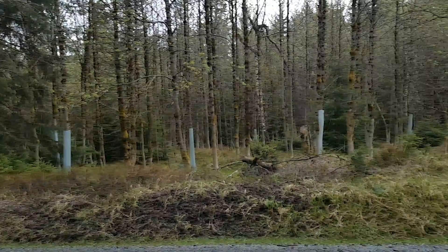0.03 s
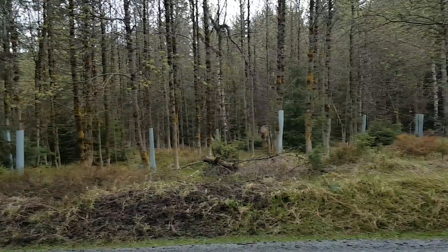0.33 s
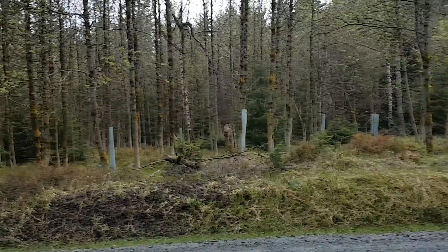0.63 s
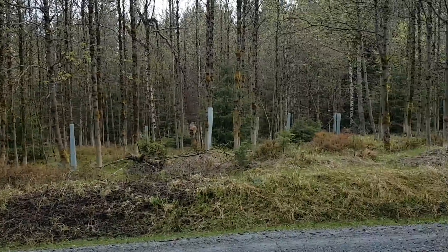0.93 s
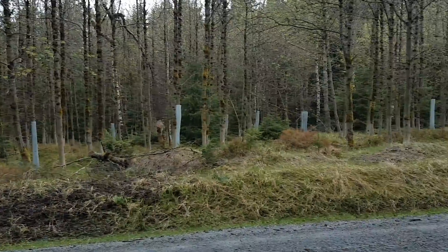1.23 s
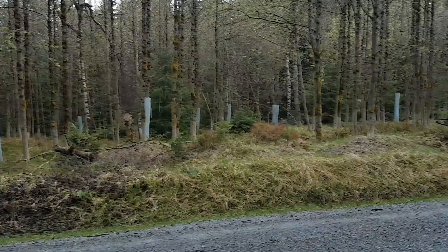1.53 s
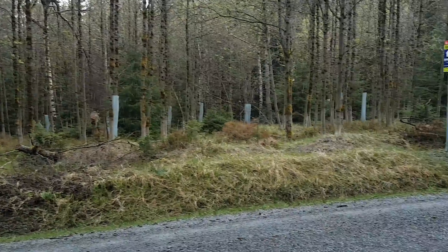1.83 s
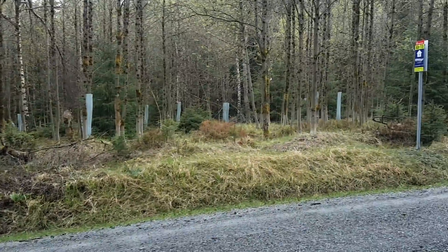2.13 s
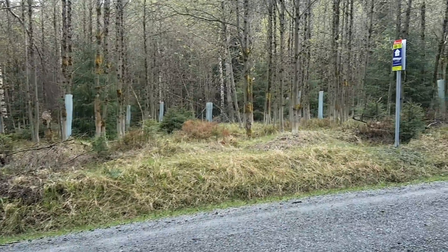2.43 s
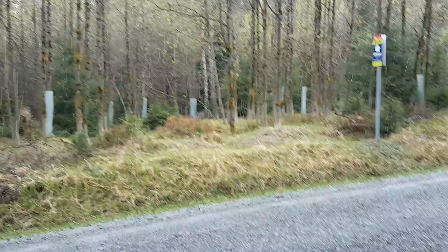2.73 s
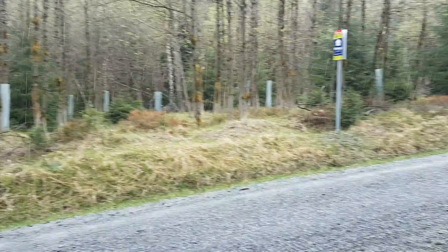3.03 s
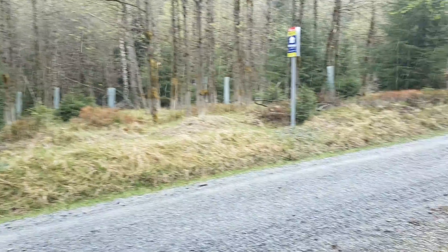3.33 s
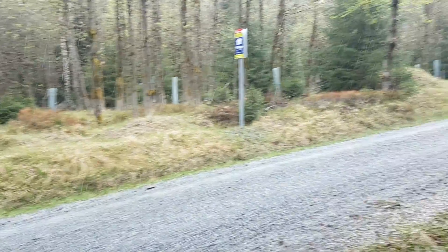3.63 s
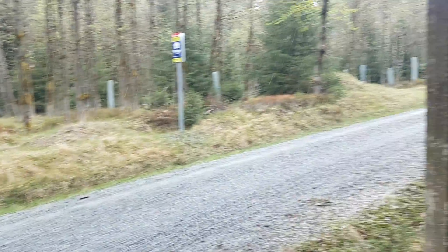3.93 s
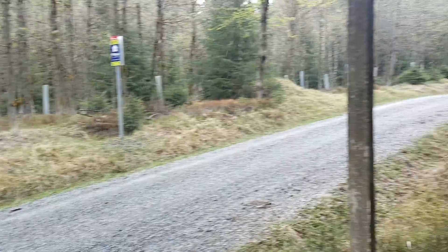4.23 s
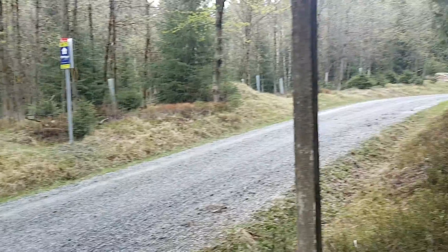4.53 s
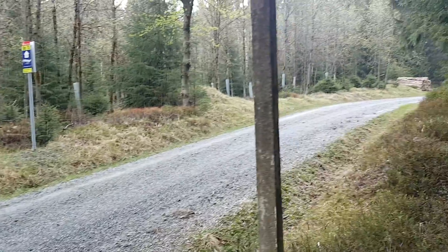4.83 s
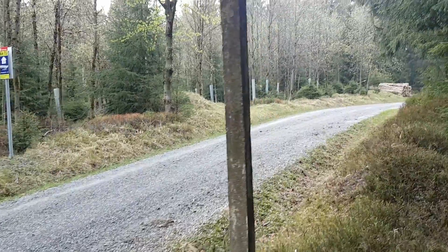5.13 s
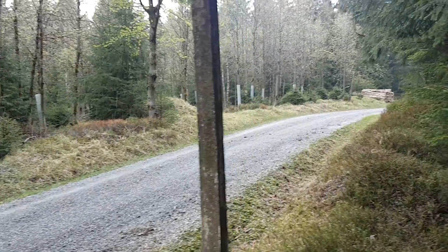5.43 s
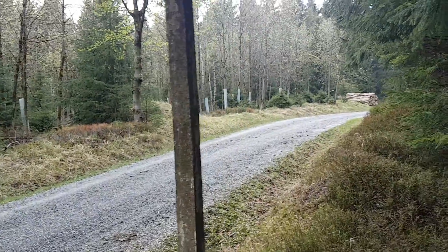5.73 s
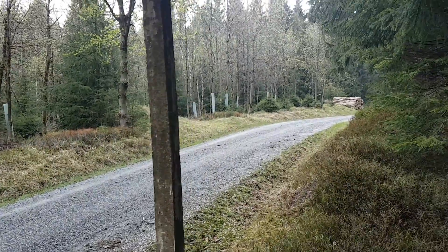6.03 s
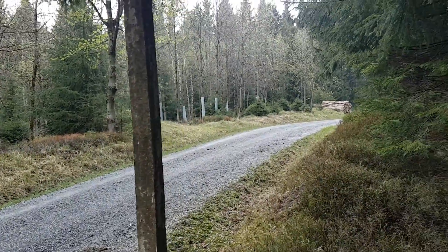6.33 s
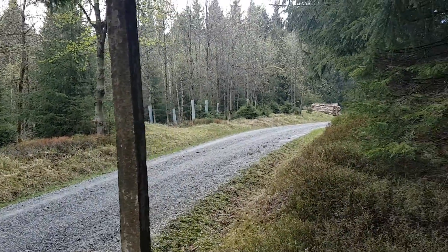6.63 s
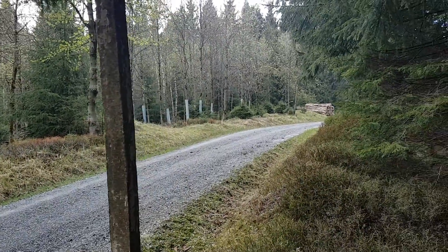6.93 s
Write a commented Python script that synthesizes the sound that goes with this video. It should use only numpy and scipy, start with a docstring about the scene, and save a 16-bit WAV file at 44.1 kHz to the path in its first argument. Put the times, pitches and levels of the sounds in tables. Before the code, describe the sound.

Fine hail and rain hiss steadily in a forest, while single hailstones click and tap sharply near the microphone.

```python
"""Fine hail and rain fall steadily on a forest road, its grass verge and the trees around it.
Each impact excites a heavily damped vibration: countless far ones merge into a hiss, nearer ones
patter, and single stones crack and ring right beside a hand-held camera with two microphone ports.
A light breeze rumbles on the ports, mostly at first; the hand bumps the camera and cloth rustles."""
import sys
import numpy as np
from scipy import signal
from scipy.fft import rfft, irfft, next_fast_len
from scipy.io import wavfile
from scipy.ndimage import map_coordinates

SR = 44100
rng = np.random.default_rng(int(sys.argv[2]) if len(sys.argv) > 2 else 0)


def wav_out(sig):
    """Save sig, one row per channel (or a flat mono array), as 16-bit PCM at SR to the path in sys.argv[1]."""
    wavfile.write(sys.argv[1], SR, np.round(np.clip(np.atleast_2d(sig).T, -1, 1) * 32767).astype(np.int16))


N = 311787

# the ports' low cut and treble dip, heard on close taps: (frequency [Hz], gain [dB])
CLOSE_RESPONSE = [(80, -54), (210, -23.5), (340, -7), (6800, 2.5), (8200, -5.5), (9200, -10), (11000, 7.5),
                  (13500, 5), (15500, 5)]
PORT_DELAY_S = .0004  # sound from one side reaches the far port this much later


def amp(db):
    """Decibels to amplitude ratio."""
    return 10 ** (np.asarray(db) / 20)


def unit(x):
    """Normalise to rms 1."""
    return x / np.sqrt(np.mean(x ** 2) + 1e-20)


def along(points, hz):
    """Interpolate (frequency [Hz], value) points on a logarithmic axis."""
    knots_hz, values = np.transpose(points)
    return np.interp(np.log(hz + 1), np.log(knots_hz + 1), values)


def wobble(rate):
    """Smooth random modulation: a spline through rate knots a second."""
    knots = rng.standard_normal(int(N * rate / SR) + 4)
    return map_coordinates(knots, [np.arange(N) * rate / SR])


def filtered(x, response):
    """Linear filtering: multiply the spectrum by a frequency response."""
    size = next_fast_len(N + SR // 4)
    return irfft(rfft(x, size) * response(np.fft.rfftfreq(size, 1 / SR)), size)[..., :N]


def minimum_phase(db):
    """Causality: folding the cepstrum gives a response that sounds only after the blow."""
    cepstrum = irfft(np.log(amp(db)))
    half = len(cepstrum) // 2
    fold = np.r_[1, np.full(half - 1, 2), 1, np.zeros(half - 1)]
    return np.exp(rfft(cepstrum * fold))


def diffuse(pair, spectrum):
    """Diffuse field: two independent signals are coloured and made partly coherent; rms 1."""
    # likeness of the two ports: (frequency [Hz], correlation [-1 to 1])
    correlation = [(50, 0.77), (480, 0.61), (850, 0.21), (1450, -0.2), (2100, 0.13), (3400, 0.098),
                   (6000, -0.12), (9500, 0.1), (13000, -0.049)]
    # their difference in colour: (frequency [Hz], left minus right [dB])
    imbalance = [(100, -1.3), (1500, -1.3), (4500, -2), (6000, -1.5), (7300, -6), (8500, 1.5), (10500, 5),
                 (14000, 2), (15500, -1)]

    def blend(hz):
        angle = np.arcsin(np.clip(along(correlation, hz), -1, 1)) / 2
        return amp(along(spectrum, hz)) * np.array([np.cos(angle), np.sin(angle)])[:, None]
    own, shared = filtered(pair, blend)
    sides = np.array([[.5], [-.5]])
    return unit(filtered(own + shared[::-1], lambda hz: amp(along(imbalance, hz) * sides)))


def taps(s, db, hz, rise_s, pan_db, lag_s, size):
    """Damped oscillators struck at times s, size samples long; a positive lag delays the right port."""
    index = (s * SR).astype(int)[:, None] + np.arange(size)
    ports = []
    for side in (.5, -.5):
        arrival = s + np.maximum(-2 * side * lag_s, 0)
        t = np.maximum(index / SR - arrival[:, None], 0)
        age = t / rise_s[:, None]
        envelope = amp(db + side * pan_db)[:, None] * age * np.exp(1 - age)
        ring = envelope * np.sin(2 * np.pi * hz[:, None] * t)
        ports.append(np.bincount(index.ravel(), ring.ravel(), N)[:N])
    return np.array(ports)


def patter(count, low_hz, high_hz, cycles, spread_db, tilt_db, size):
    """Shot noise of rms 1: a positive spread_db makes far impacts fainter; tilt_db is per octave."""
    when, pitch, distance, life, side, direction = rng.random((count, 6)).T
    hz = low_hz * (high_hz / low_hz) ** pitch
    db = -spread_db * np.log(distance + 260 / count) + tilt_db * np.log2(hz / low_hz)
    rise_s = cycles * (.5 + life) / hz
    lag_s = PORT_DELAY_S * np.cos(np.pi * direction)
    return unit(taps(when * N / SR, db, hz, rise_s, 14 * (side - .5), lag_s, size))


def shower():
    """Superposition: far impacts merge into hiss; nearer ones tick on gravel, twigs and turf."""
    # spectrum of impacts on hard surfaces: (frequency [Hz], relative level [dB])
    hard = [(100, -36), (400, -16.5), (1000, -5.5), (1700, 1.5), (2600, -1.5), (5300, -1.5), (7200, -3.5),
            (8200, -14.5), (9200, -20.5), (10500, -15), (12600, -10.5), (15700, -9)]
    # spectrum of impacts on soft turf: (frequency [Hz], relative level [dB])
    turf = [(60, -13), (150, -38), (230, -9), (330, -4), (500, 1), (750, -2), (1400, -3), (3000, -12),
            (8000, -34)]
    ticks = patter(7000, low_hz=1254, high_hz=15300, cycles=0.46, spread_db=5.5, tilt_db=7, size=96)
    tinkle = patter(1500, low_hz=9100, high_hz=15400, cycles=0.99, spread_db=10, tilt_db=-18, size=96)
    hiss = diffuse(rng.standard_normal((2, N)), hard)
    bright = amp(1) * hiss + amp(-5.5) * diffuse(ticks, hard) + amp(-22.5) * diffuse(tinkle, hard)
    flurry_db = 0.18 * wobble(10) + 0.81 * wobble(45)  # the stones arrive in clumps
    pats = patter(1500, low_hz=430, high_hz=2140, cycles=0.61, spread_db=4, tilt_db=5, size=256)
    dull = amp(-2) * diffuse(rng.standard_normal((2, N)), turf) + amp(-8.5) * diffuse(pats, turf)
    drift_db = 0.23 * wobble(4.5)
    return amp(drift_db) * (amp(-50.5 + flurry_db) * bright + amp(-59.5) * dull)


def breeze():
    """Turbulence: moving air makes the pressure at the ports fluctuate in an uneven rumble."""
    # one gust, then the breeze drops: (time [s], level [dB])
    strength = [(0, -63.5), (.33, -65), (.47, -60.5), (.66, -57.5), (.84, -59.5), (1.05, -65.5),
                (2.65, -64.5), (2.9, -73.5), (4.4, -77), (4.7, -70), (5.2, -76), (7.07, -74)]
    # spectrum of the wind noise: (frequency [Hz], relative level [dB])
    rumble = [(20, -10), (40, -8.5), (90, 1.5), (220, 0.5), (350, -8), (800, -14.5), (3000, -39)]
    level_db = np.interp(np.arange(N) / SR, *np.transpose(strength))
    return amp(level_db - 0.5 + 0.7 * wobble(22)) * diffuse(rng.standard_normal((2, N)), rumble)


def stray_stones():
    """Sparse impacts are heard singly: stones click a few steps away and tiny chips tick on twigs."""
    clicks = patter(60, low_hz=1850, high_hz=7000, cycles=0.87, spread_db=-4, tilt_db=-3, size=256)
    chips = patter(130, low_hz=10500, high_hz=14800, cycles=1.8, spread_db=7, tilt_db=1, size=96)
    return filtered(amp(-68.5) * clicks + amp(-79) * chips, lambda hz: amp(along(CLOSE_RESPONSE, hz)))


def close_stones():
    """Impact excitation: ice cracks on contact, two modes of what it hits ring, and the ground thuds."""
    # hailstones within reach: (time [s], ring level [dB], ring frequency [Hz], ring rise [cycles],
    # overtone level [dB], overtone frequency [Hz], crack level [dB], left minus right [dB],
    # bearing [-1 right to 1 left])
    stones = [(0.065, -29, 1800, .45, -45, 3740, -44, 3, .75),
              (.2732, -39, 2090, 3, -36, 4860, -34, -5, 0.24),
              (.3555, -40, 2310, .67, -52, 9830, -50, -6, .53),
              (0.732, -33.5, 1140, 0.64, -35, 2090, -38, 1, -0.2),
              (0.8533, -37, 1040, 1, -46, 1430, -54, -3, -0.065),
              (0.922, -37.5, 1130, 1.2, -43, 2060, -30, 2, 0),
              (1.1537, -35.5, 1440, .46, -39, 4510, -40, 0, 0),
              (1.4956, -37.5, 700, 0.48, -40, 7900, -55, 1, .15),
              (1.625, -31, 3260, 0.24, -45, 6700, -48, -3, -0.59),
              (1.7857, -35.5, 7200, .82, -36.5, 11610, -42, 8, .5),
              (2.101, -36, 13080, 1.1, -44, 6040, -42, 2, -.9),
              (2.201, -36.5, 1140, .55, -38, 4140, -28, -1, 0.3),
              (2.5894, -34, 4020, 0.52, -50, 12000, -46, -6, 0.48),
              (2.598, -25, 1710, .16, -46, 8770, -49, -3, 0),
              (2.7587, -28.5, 3170, .65, -27, 4760, -34, -6, -0.8),
              (2.8747, -36.5, 600, 0.57, -36, 1230, -42, 0, -0.33),
              (2.876, -40, 640, 0.36, -38.5, 1210, -40, -6, -0.43),
              (2.9424, -35, 1320, 0.49, -43, 1840, -47, -1, -0.044),
              (3.0745, -30, 1650, .45, -50, 2540, -50, -5, 1),
              (3.1389, -27.5, 2200, .58, -33, 4300, -17, -3, -.1),
              (3.1394, -36, 14600, 1, -48, 15400, -50, 1, -0.64),
              (3.2697, -31.5, 6650, 0.85, -44, 7710, -42, 3, 0.78),
              (3.3686, -30, 1120, 0.33, -40, 2400, -49, -2, 0.19),
              (3.4362, -37, 5900, 1, -46, 6940, -47, -3, -.4),
              (3.5456, -41, 14900, 2.4, -52, 15500, -50, 6, .5),
              (3.928, -28, 4190, 0.66, -47, 7420, -50, -1, 0.44),
              (4.0742, -35.5, 6100, 0.54, -42, 13000, -46, 12, .2),
              (4.477, -36, 7220, .75, -36, 12830, -45, 2, -.5),
              (4.5752, -39, 520, 0.7, -37, 1450, -51, 1, .1),
              (4.6049, -24, 1140, 0.22, -44, 5500, -46, -2, 0),
              (4.637, -40, 630, 0.68, -52, 1300, -54, -1, 0),
              (4.7098, -38, 1800, 0.31, -36, 4600, -37, -1, 0),
              (4.716, -38, 570, 0.55, -42, 4310, -42, -1, -0.021),
              (4.732, -36, 3220, 0.63, -43, 14420, -42, -1, 0.026),
              (4.782, -30.5, 1450, 0.29, -44, 5200, -50, 2, -0.15),
              (4.8162, -32.5, 7500, 1, -35, 9300, -41, 2, -0.65),
              (4.884, -33.5, 1180, .5, -37, 2500, -47, -3, .26),
              (4.905, -27, 1750, 0.43, -35, 2940, -32, -1, 1),
              (4.9057, -44, 2140, 3, -44, 3020, -52, -1, .85),
              (4.959, -35, 2720, .5, -39, 6610, -46, -7, -.46),
              (5.003, -28, 4860, 1.3, -34, 6540, -32, 3, 0.36),
              (5.0817, -15, 800, 0.072, -45, 1090, -45, -1.5, -.24),
              (5.1374, -33, 5280, .69, -40, 6270, -46, -3, .6),
              (5.3187, -33.5, 6140, .55, -46, 11780, -41, 4, 0),
              (5.3326, -26, 3370, 0.28, -48, 8690, -47, -2, .58),
              (5.3703, -22.5, 1640, 0.27, -30, 3250, -29, 0, 0.25),
              (5.537, -23, 1830, .6, -49, 5230, -48, -2.5, 0.44),
              (5.6717, -30, 10700, 1.4, -38, 14120, -30, 6, .55),
              (5.773, -40.5, 14680, 1.6, -50, 15500, -53, 0, .65),
              (5.9703, -26, 1180, 0.39, -36, 1890, -51, -3, 0),
              (6.1494, -31, 14700, 1.5, -42, 10500, -39, 0, -.9),
              (6.1568, -32.5, 6680, .7, -35, 14330, -45, 1, -.7),
              (6.2612, -28, 2300, 0.53, -36, 4830, -52, -3, -.66),
              (6.3577, -9.5, 5370, 1.28, -24, 14800, -24, -7.5, .78),
              (6.365, -39, 12860, 2.2, -43, 14920, -53, 6, .47),
              (6.4399, -32, 1180, 0.75, -27.5, 2900, -36, 0, 0.17),
              (6.4403, -32, 1840, 0.95, -48, 3800, -52, -6, 0.11),
              (6.503, -29.5, 5940, 0.35, -47, 9200, -41, 3, .86),
              (6.568, -35.5, 7600, 1, -41, 10040, -49, -5, -.9),
              (6.6607, -34, 700, 0.71, -34, 1440, -33, 0, -0.084),
              (6.6609, -31, 2680, 0.81, -29.5, 14400, -44, -4, -0.22),
              (6.676, -38, 10100, 2.1, -45, 13250, -38, 5, -.9),
              (6.6935, -34, 3950, .6, -37, 8430, -34, -1, -.05),
              (6.7098, -36, 1850, 1, -50, 4000, -50, 0, .5),
              (6.7101, -30.5, 13500, .9, -39, 15300, -36, 8, .8),
              (6.7366, -16, 1690, .65, -26, 4000, -42, -4, 0.22),
              (6.8546, -21, 1960, 0.41, -40, 4110, -44, -3, -.15),
              (6.939, -30.5, 4300, .6, -50, 8630, -46, -6, -.63),
              (6.9543, -26.5, 5700, 0.4, -42, 15010, -45, 4, .64),
              (6.99, -26, 1140, 0.53, -32, 1750, -45, -2, -0.034),
              (6.999, -31, 4030, .67, -36, 7050, -43, -6, 0.15),
              (7.0107, -23.5, 2020, 0.38, -41, 8810, -46, -4, -0.65),
              (7.028, -30, 1690, 0.51, -44, 7500, -48, 3, -0.35)]
    # the first hard contact of any stone: (frequency [Hz], relative level [dB], rise time [s])
    contact_modes = [(2970, -2.5, 0.00013), (5700, -1.5, 0.00011), (14200, -26, 0.000048)]
    s, db, hz, cycles, over_db, over_hz, crack_db, pan_db, bearing = np.transpose(stones)
    overtone_cycles, thud_hz, thud_rise_s = 0.93, 487, 0.00085
    lag_s = PORT_DELAY_S * np.clip(bearing, -1, 1)
    each = np.ones(len(s))
    ring = taps(s, db, hz, cycles / hz, pan_db, lag_s, size=600)
    overtone = taps(s, over_db, over_hz, overtone_cycles / over_hz, pan_db, lag_s, size=400)
    crack = sum(taps(s, crack_db + mode_db, mode_hz * each, rise_s * each, pan_db, lag_s, size=64)
                for mode_hz, mode_db, rise_s in contact_modes)
    thud = taps(s, db - 23.5, thud_hz * each, thud_rise_s * each, pan_db, lag_s, size=400)
    direct = ring + overtone + crack + thud
    heard = amp(-1.22) * direct + amp(-11) * scatter(direct, t60=0.017, size=700)
    return filtered(heard, lambda hz: minimum_phase(along(CLOSE_RESPONSE, hz)))


def scatter(x, t60, size):
    """Scattering: nearby surfaces return a short decaying tail, different at each port."""
    tail = rng.standard_normal((2, size)) * amp(-60 * np.arange(size) / SR / t60)
    return signal.fftconvolve(x, tail / np.linalg.norm(tail[0]), axes=1)[:, :N]


def hand_bumps():
    """Structure-borne sound: the hand's soft knocks reach both ports at once."""
    # knocks on the camera: (time [s], level [dB], frequency [Hz], rise [cycles], left minus right [dB])
    knocks = [(0.403, -50, 180, 0.15, -26), (0.649, -50, 130, 0.27, -2), (0.778, -60, 90, 0.24, -1),
              (0.931, -53, 90, 0.24, -5), (2.598, -39.5, 215, 0.31, -1), (2.987, -43.5, 364, 0.39, 1),
              (3.141, -56, 220, 0.57, 1), (3.202, -60, 160, 0.26, 2)]
    s, db, hz, cycles, pan_db = np.transpose(knocks)
    return taps(s, db, hz, cycles / hz, pan_db, lag_s=np.zeros(len(s)), size=2000)


def cloth_rustles():
    """Stick-slip friction: many small slips of cloth merge into rustles that swell and fade."""
    # movements of the cloth: (centre time [s], half length [s], level [dB])
    movements = [(0.68, 0.135, -52.5), (2.995, 0.27, -55), (4.683, 0.26, -55.5)]
    # spectrum of the rubbing: (frequency [Hz], relative level [dB])
    cloth = [(100, -4), (300, 1), (600, -3.5), (1400, 4.5), (2000, 3.5), (3500, -41), (8000, -26),
             (15000, -40)]
    t = np.arange(N) / SR
    swell = sum(amp(db) * np.exp(-((t - s) / half) ** 2) for s, half, db in movements)
    slips = patter(4000, low_hz=394, high_hz=3900, cycles=0.79, spread_db=2.5, tilt_db=5.5, size=200)
    return swell * diffuse(slips, cloth)


def scene():
    """Superposition: the pressures of all sources add at the two ports."""
    return shower() + breeze() + cloth_rustles() + close_stones() + stray_stones() + hand_bumps()


def record(dry):
    """Band limiting: the sound has no treble above 15.8 kHz."""
    cutoff_hz = 15800
    return filtered(dry, lambda hz: hz < cutoff_hz)


dry = scene()
out = record(dry)
wav_out(out)
```